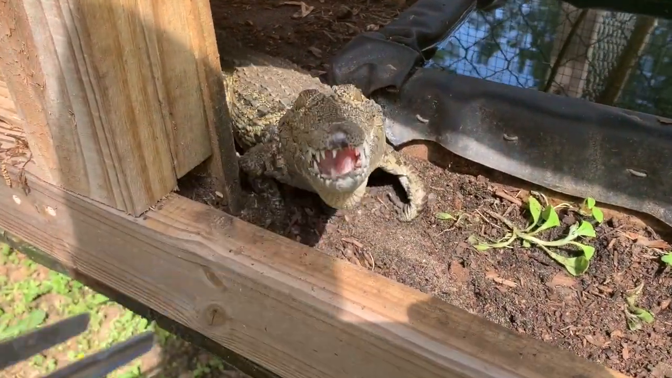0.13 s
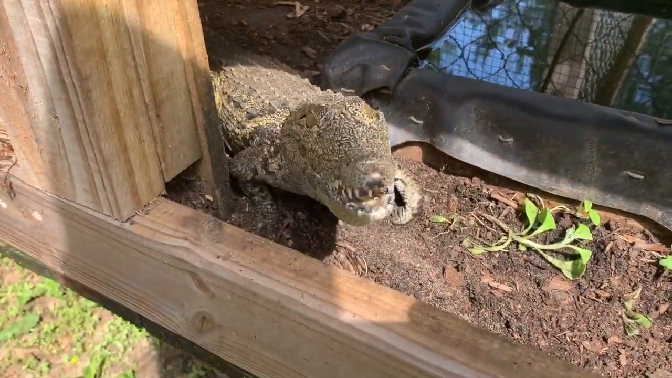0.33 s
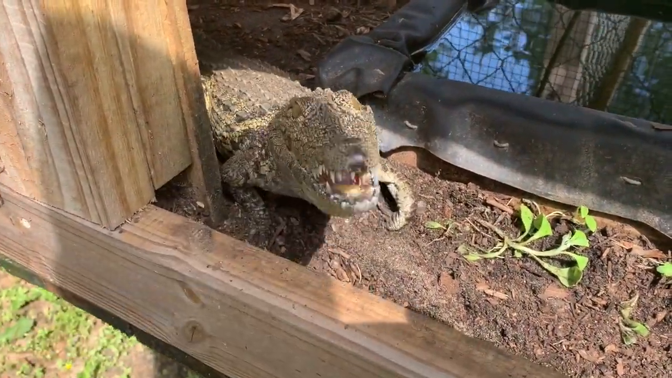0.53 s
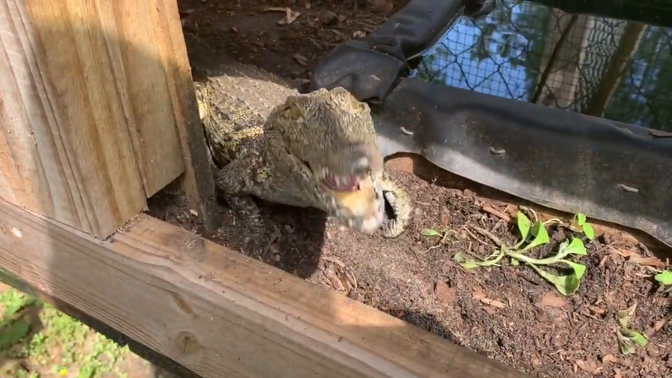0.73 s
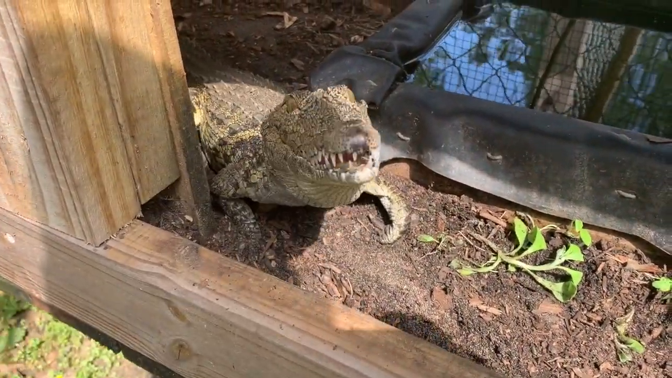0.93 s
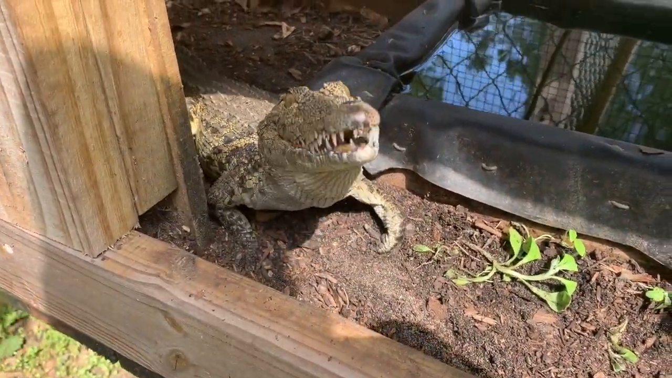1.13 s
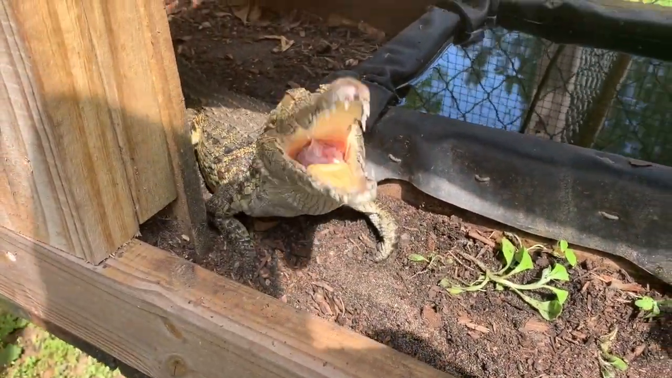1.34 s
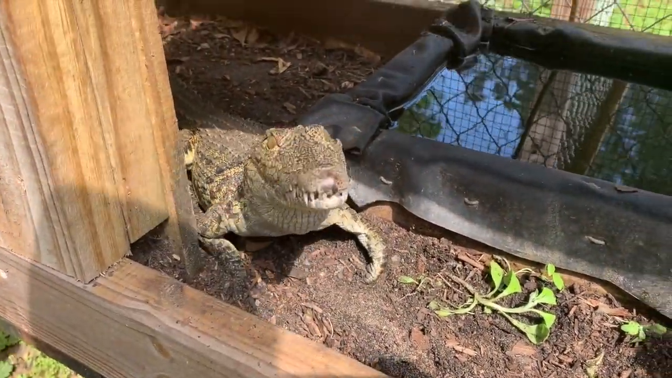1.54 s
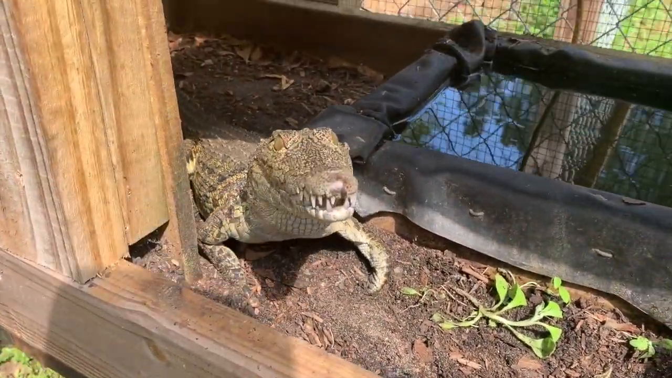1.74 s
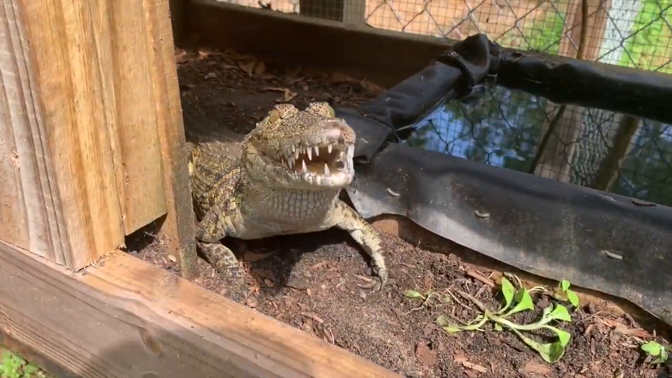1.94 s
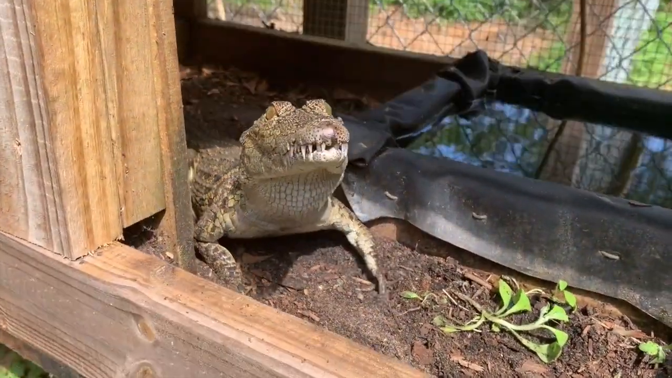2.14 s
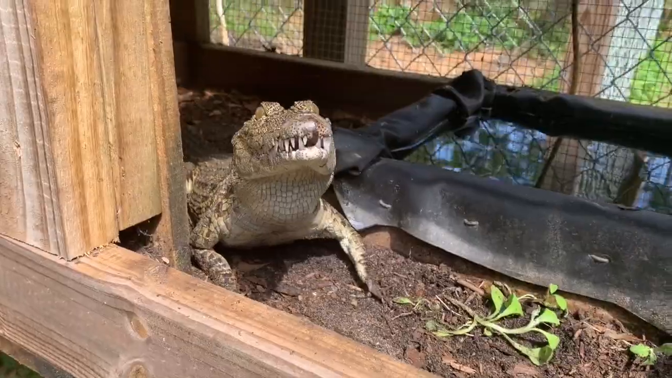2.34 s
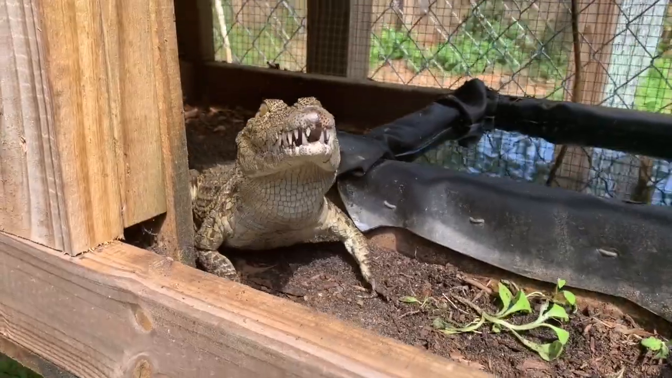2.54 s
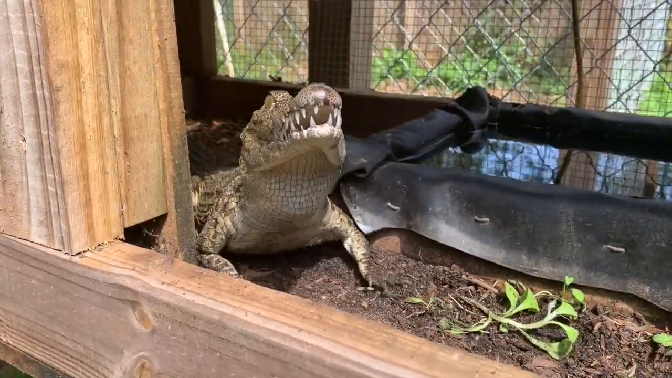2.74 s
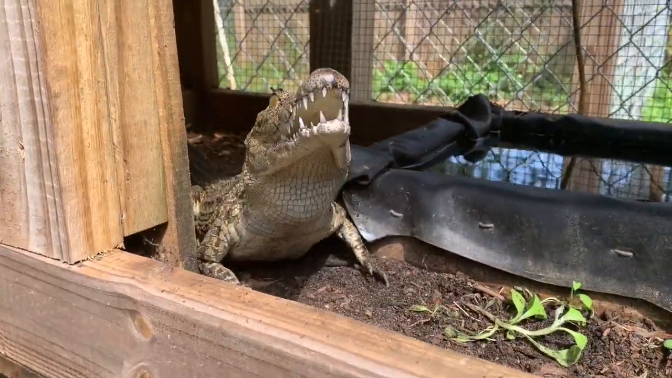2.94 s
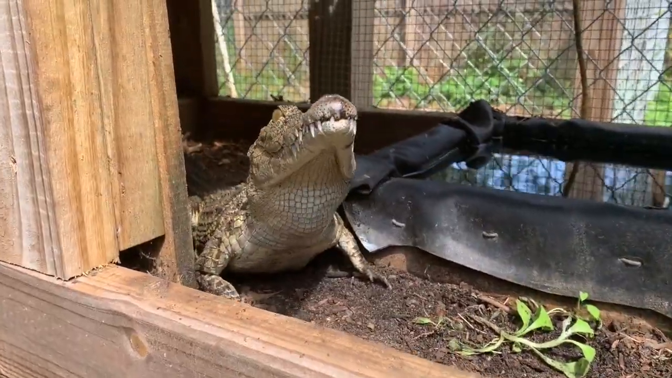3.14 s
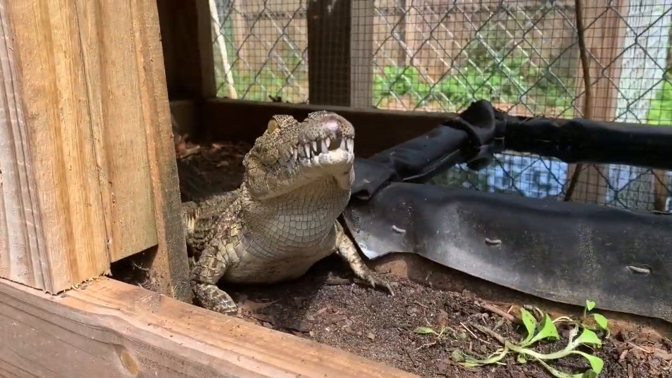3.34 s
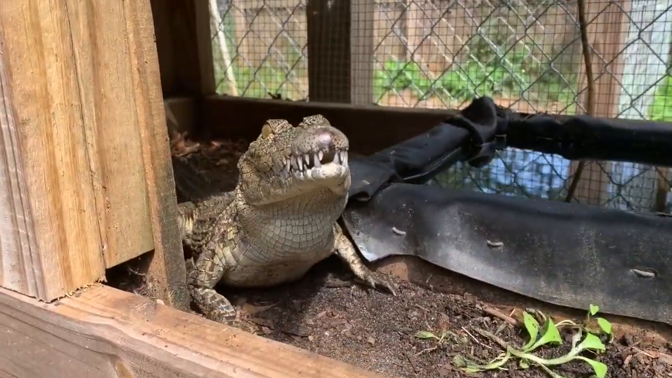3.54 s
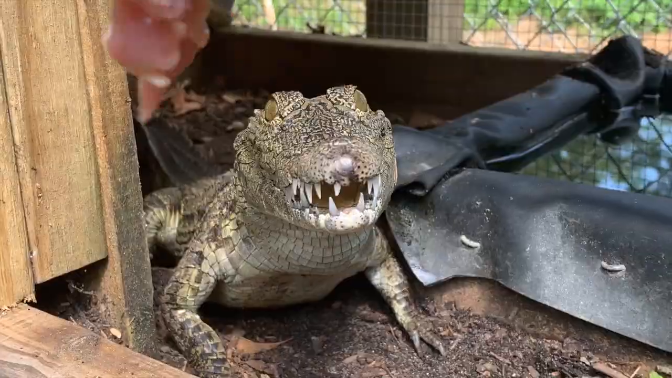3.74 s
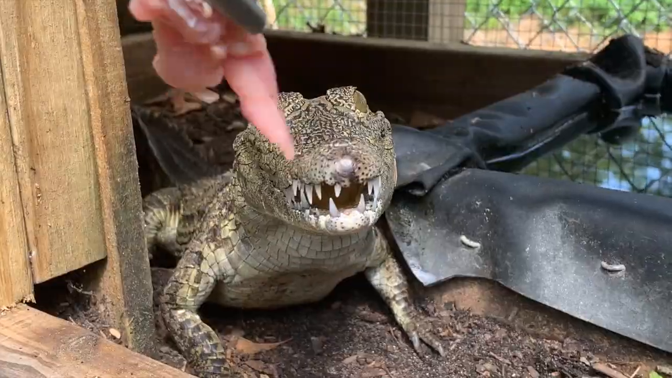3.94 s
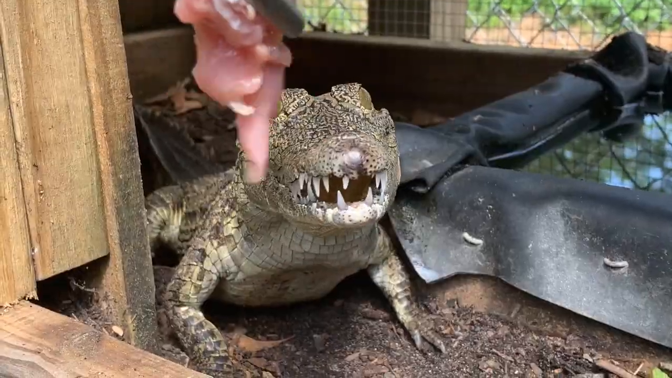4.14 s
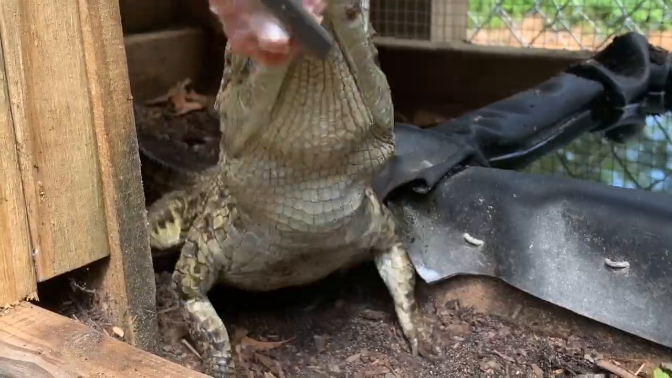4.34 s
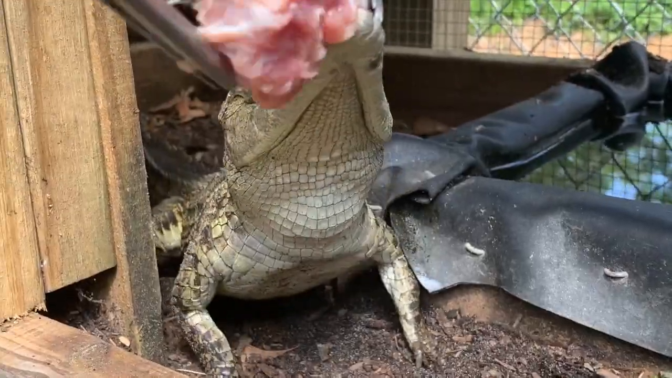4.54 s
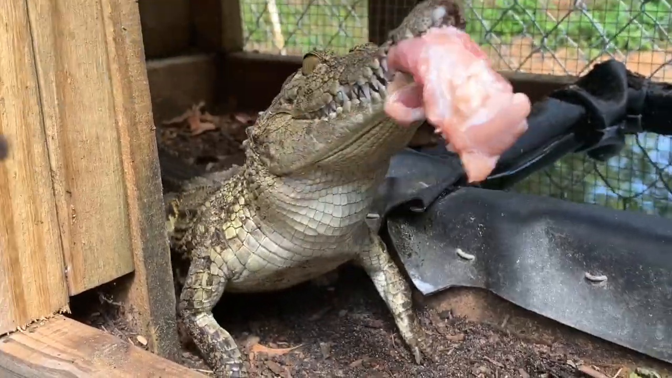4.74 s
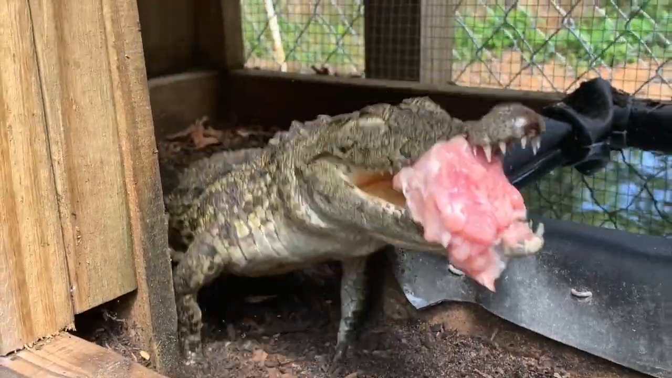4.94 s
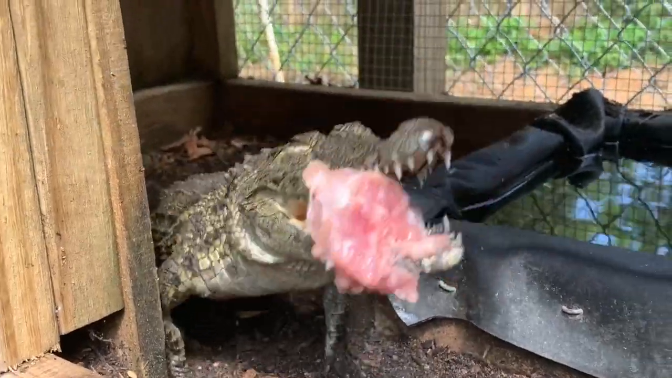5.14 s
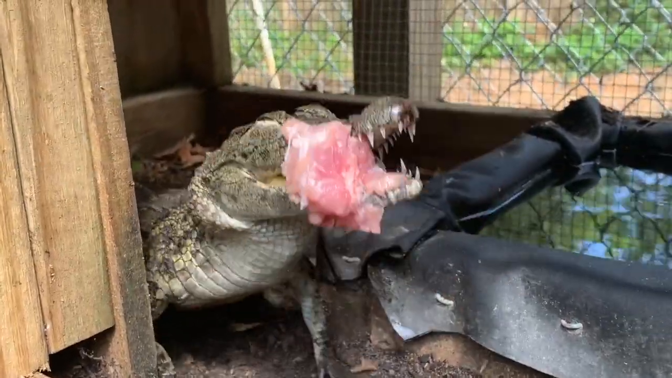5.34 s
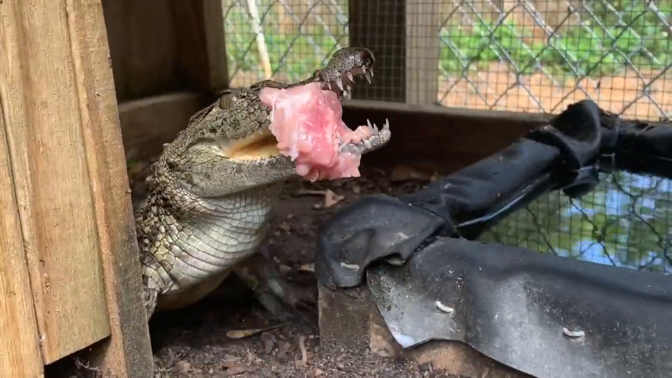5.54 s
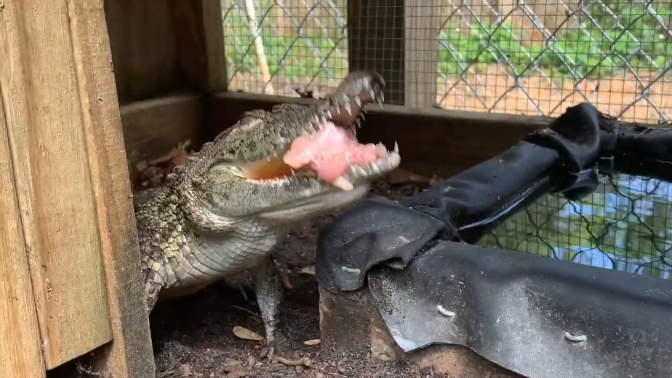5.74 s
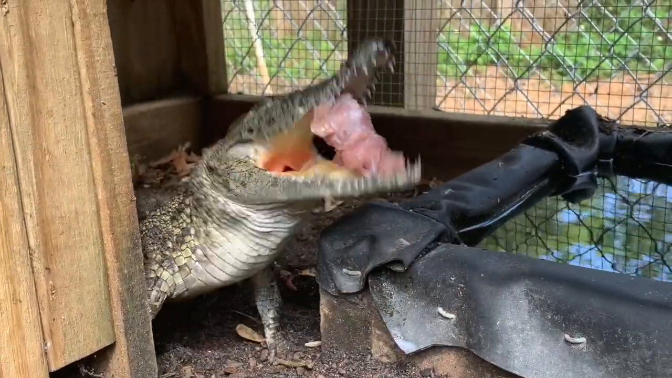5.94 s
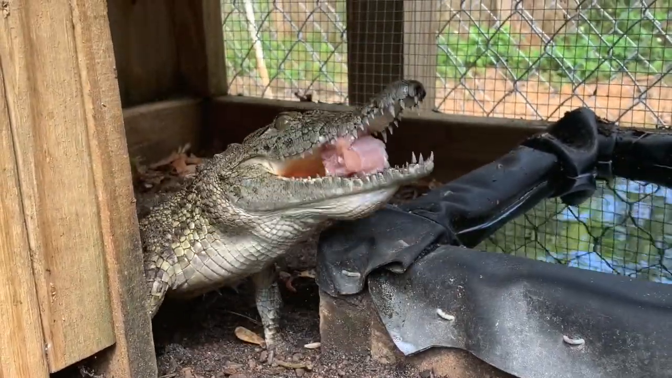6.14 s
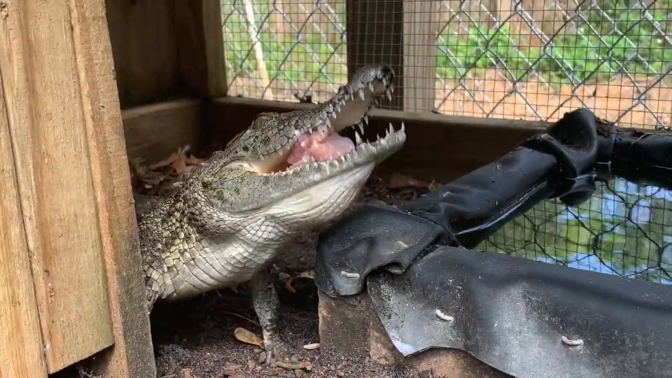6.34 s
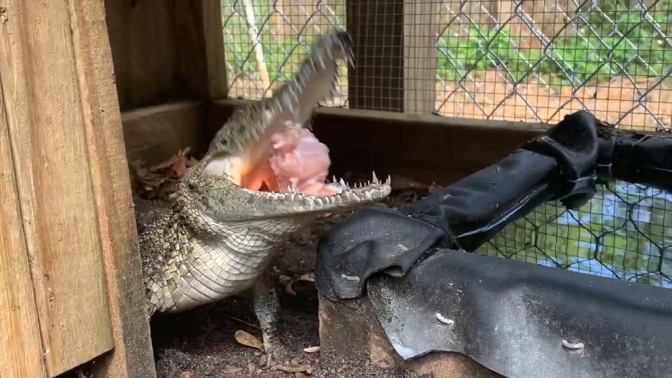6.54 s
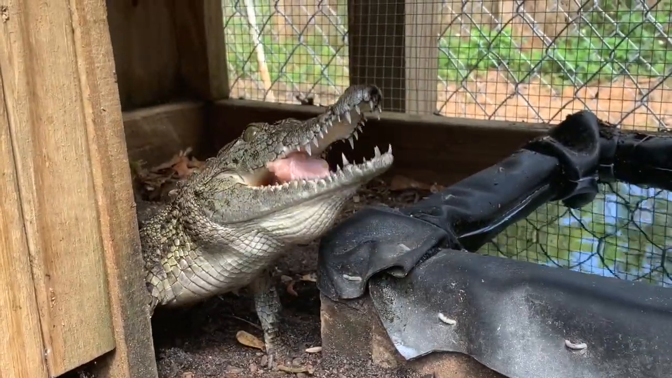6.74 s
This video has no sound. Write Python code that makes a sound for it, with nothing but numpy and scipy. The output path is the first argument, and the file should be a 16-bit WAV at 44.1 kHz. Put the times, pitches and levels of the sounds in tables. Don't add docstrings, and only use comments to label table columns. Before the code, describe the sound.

Outdoors, near a phone, faint claw ticks and soft soil rustle sit over low distant traffic, thin tree hiss and very faint insect trills. From 0.6 to 1.3 s dry twigs crack in irregular clusters, with a sharp snap at 0.8 and the strongest crackles around 1.1. A brief firm scrape comes at 1.6, then quiet, restless shuffling with scattered leaf ticks until 3.2. Snaps, cracks and a faint hollow board rub return from 3.2 to 3.7, then it hushes. Leaves crunch and feet land softly at 4.35, and at 4.44 teeth hit steel tongs: a loud, bright, very fast clack with a short metallic ring. At 4.9 the body drops with a dull, deep thud and claw clicks. From 5.1 to 6.6 come crisp chewing snaps and small wet ticks, strongest near 5.3, 5.7 and 6.3, thinning over the faint rumble.

```python
import sys
import numpy as np
from scipy import signal
from scipy.fft import rfft, irfft, next_fast_len
from scipy.io import wavfile
from scipy.ndimage import uniform_filter1d, map_coordinates

SR = 44100
rng = np.random.default_rng(int(sys.argv[2]) if len(sys.argv) > 2 else 0)


def materialize(psi):
    bounded = np.clip(np.atleast_2d(psi).T, -1, 1)
    quanta = np.round(bounded * 32767).astype(np.int16)
    wavfile.write(sys.argv[1], SR, quanta)


def invert_db(level):
    return 10 ** (np.asarray(level, dtype=float) / 20)


N = 299306


def unit(x):
    return x / np.sqrt(np.mean(x ** 2) + 1e-20)


def along(points, hz):
    f, v = np.transpose(points)
    return np.interp(np.log(hz + 1), np.log(f + 1), v)


def curves(rows):
    s, *cols = np.transpose(rows)
    return [np.interp(np.arange(N) / SR, s, c) for c in cols]


def wobble(rate):
    knots = rng.standard_normal(int(N * rate / SR) + 4)
    return map_coordinates(knots, [np.arange(N) * rate / SR])


def filtered(x, response):
    n = x.shape[-1]
    m = next_fast_len(n + 4096)
    return irfft(rfft(x, m) * response(np.fft.rfftfreq(m, 1 / SR)), m)[..., :n]


def noise(spectrum, n=N):
    return unit(filtered(rng.standard_normal((2, n)), lambda hz: invert_db(along(spectrum, hz))))


def add(track, s, sound):
    part = track[..., round(s * SR):][..., :sound.shape[-1]]
    part += sound[..., :part.shape[-1]]


def decay(t, t60, attack):
    return invert_db(-60 * t / t60) * (1 - np.exp(-t / attack))


def patchy(pair, depth_db):
    def smooth(bins, frames):
        rough = rng.standard_normal(z.shape[1:])
        return unit(uniform_filter1d(uniform_filter1d(rough, size=bins, axis=0), size=frames, axis=1))
    z = signal.stft(pair, nperseg=256)[2]
    gain_db = depth_db * smooth(4, 9) + 3.06 * smooth(2, 60)
    return unit(signal.istft(z * invert_db(gain_db), nperseg=256)[1][:, :N])


def bite():
    # t/s, peak level/dB, t60/s
    teeth = [
        (4.4409, -9, .003),
        (4.4413, -5, .003),
        (4.4423, -7, .006),
        (4.4428, -6, .008),
        (4.4441, -13, .012),
        (4.4466, -8, .009),
        (4.4487, -15, .014),
        (4.4522, -23, .018),
        (4.4568, -25, .010),
    ]
    # f/Hz, level/dB
    enamel = [(600, -37.5), (1500, -34.5), (2200, -15), (3000, -41.5), (4500, -11), (6500, -17.5),
              (8700, -6), (10200, -4), (11600, -1), (13200, 0), (14800, -3), (16000, -9), (16700, -45.5)]
    # f/Hz, level/dB, t60/s
    tongs = [(1880, -35, 0.075), (3505, -45, 0.0498), (3650, -37.5, 0.11), (4230, -24.5, 0.04),
             (4800, -23, 0.04), (5440, -22, 0.045), (10500, -23, .02), (14850, -19.5, 0.014)]
    out, t = np.zeros((2, N)), np.arange(SR // 5) / SR
    for s, db, t60 in teeth:
        contact = noise(enamel, len(t)) * decay(t, t60, 0.000067)
        add(out, s, invert_db(db + 0.5) * contact / np.abs(contact[0]).max())
    slide = noise([(3000, -22), (4800, 1), (7500, -7.5), (9500, -45.5)], len(t))
    add(out, 4.43, invert_db(-33.0) * slide * decay(t, 0.082, 0.0048))
    drift = np.cumsum(rng.standard_normal((len(tongs), len(t))), axis=1) * 0.027
    for (hz, db, t60), phase in zip(tongs, drift):
        ring = np.sin(2 * np.pi * hz * t + phase)
        add(out[0], teeth[1][0], invert_db(db) * decay(t, t60, 0.00054) * ring)
    return out


def clicks():
    # t/s, peak level/dB, brightness/dB, main resonance f/Hz
    twigs = [(.6111, -27.5, -7, 2020), (.6306, -31.5, -28, 2900), (.6574, -32.5, -46, 1800),
             (.7406, -36, -29, 1220), (.7492, -31, -28, 1210), (.7676, -25, -26, 2160),
             (.7983, -31.5, -19, 1870), (.8483, -31.5, -14, 2970), (.954, -34.5, -21, 1520),
             (.9619, -38, -23, 2180), (.986, -38.5, -31, 2210), (1.0611, -38.5, -20, 1490),
             (1.1115, -18.5, 0.5, 2100), (1.1328, -24, -9, 2310), (1.1372, -16.5, -10, 2200),
             (1.1425, -25, -30, 1300), (1.166, -32, -15, 3300), (1.191, -35.5, -30, 2020),
             (1.237, -34.5, -20, 2500), (1.08, -37, -30, 2800), (1.1557, -22.5, -24, 1230),
             (1.2275, -25, -19.5, 2100), (1.2813, -33, -33, 1520), (1.7359, -36.5, -45, 1180),
             (2.3597, -38, -18, 1680), (2.5618, -42, -38, 1600), (2.664, -39.5, -26, 1820),
             (2.7307, -42, -44, 1230), (3.485, -25, -14.5, 1170), (3.5145, -35, -14, 1570),
             (3.5445, -28.5, -20, 1340), (3.6368, -25.5, -21, 1320), (3.7333, -45, -36, 1530),
             (5.4707, -44, -15, 2020), (6.0134, -34.5, -22, 1775)]
    # t/s, peak level/dB, brightness/dB, main resonance f/Hz
    leaves = [(.683, -36.5, -44, 2680), (.9128, -40, -28, 3230), (1.0077, -39, -22, 1740),
              (1.7946, -45.5, 11, 1810), (1.9383, -37, -16, 4330), (2.2946, -39, -15, 6400),
              (2.3365, -47, -10, 2710), (2.3676, -37, -22, 2040), (2.6363, -40, -30, 2330),
              (2.8648, -47.5, -45, 2060), (3.1629, -37.5, -29, 1530), (3.3118, -40, -9, 1360),
              (3.4097, -36, -15, 4200), (3.4357, -34.5, -38, 2440), (3.4482, -32.5, -20, 1350),
              (3.6028, -30.5, -15.5, 5300), (4.3513, -32.5, -7.5, 3940), (4.392, -22.5, -9, 3320),
              (4.497, -43, -20, 3920), (4.545, -48, -2, 2400), (4.578, -47.5, -16, 3900),
              (4.6, -52, -18, 2200), (4.635, -44, -17, 2200), (4.665, -50, -11, 2600),
              (4.8695, -41.5, 13.5, 3680), (5.0975, -46, 1, 5000), (5.7296, -29, 9, 2020),
              (6.7706, -37, -68, 1860)]
    # t/s, peak level/dB, brightness/dB
    claws = [(0.0944, -33.5, 17), (0.1406, -36.5, 41), (0.5103, -40, 26), (1.057, -39, 21),
             (1.0723, -31, 51), (1.0883, -28.5, 43), (1.3022, -43, 4), (1.4436, -36, 17), (1.4582, -41, 14),
             (1.4647, -30, 30), (4.9083, -20, 28), (4.9163, -20.5, 14), (4.92, -26.5, -10),
             (5.3716, -33.5, 13), (5.5962, -34.5, 51), (5.722, -40, 15), (5.782, -36, 17), (6.0375, -38, 9),
             (6.296, -36, 17), (6.5842, -36, 28)]
    # t/s, peak level/dB, brightness/dB, main resonance f/Hz
    snaps = [(.8243, -17, -16, 2710), (2.4093, -47, -5, 4410), (3.2552, -27, -13.5, 5360),
             (5.1314, -31.5, 10, 5060), (5.1376, -31, 7, 4780), (5.1576, -35.5, 7, 5920),
             (5.221, -33.5, -15, 2230), (5.2816, -38, -2, 4700), (5.2872, -24, -12, 5500),
             (5.3237, -17.5, -4.5, 5100), (5.5504, -41.5, -35, 2170), (5.6918, -33, 12, 5200),
             (5.7355, -21, -10.5, 4800), (5.9831, -39, 3, 5840), (6.0763, -31.5, -18, 2220),
             (6.0919, -38, -8, 2720), (6.3363, -21, 8.5, 5060), (6.5381, -46.5, -37, 1885),
             (6.5967, -36, 12, 5710), (6.625, -48, 1, 4540)]
    # t/s, peak level/dB, brightness/dB, main resonance f/Hz
    ticks = [(5.2302, -25, -5, 3000), (5.2447, -43, 8, 7000), (5.2519, -32, 7, 5880), (5.259, -30, 6, 7500),
             (5.295, -30, -9, 4500), (5.3305, -31, 4, 6000), (5.345, -37, 12, 7500),
             (5.3927, -20.5, 3, 5300), (5.6885, -36, 5, 6500), (5.7415, -32, 0, 5000),
             (5.753, -37, 4, 8000), (5.757, -38, 10, 8000), (4.409, -34, 20, 8000), (3.5, -46, 8, 7000),
             (4.429, -41, 15.5, 8000), (5.274, -50, 5, 7000), (3.203, -54, -15, 4800)]
    claw_hz = 1990
    claws = [(*row, claw_hz) for row in claws]
    # rows, bass tilt/dB, t60/s, tail level/dB
    kinds = [(twigs, -8.5, 0.017, -16.5), (leaves, -9, 0.041, -12), (claws, -2, 0.0049, -19.5),
             (snaps, -23.5, 0.015, -17), (ticks, -17.5, 0.0061, -18.5)]
    out, t = np.zeros((2, N)), np.arange(SR // 12) / SR
    modes = np.geomspace(400, 16000, num=70)
    for rows, low_db, t60, tail_db in kinds:
        body = decay(t, t60, 0.00007)
        spike = invert_db(2.5) * decay(t, 0.0017, 0.00027)
        tail = invert_db(tail_db) * decay(t, 0.069, 0.00128)
        for s, db, high_db, hz in rows:
            colour = [(120, low_db - 22.0), (600, low_db + 6), (hz * 0.6, 0.55 * low_db - 3.5),
                      (hz * 0.91, -5), (hz, 3), (hz * 1.03, -5),
                      (9000, high_db - 0.5), (15500, high_db - 6.0), (16600, -50)]
            modes_db = along(sorted(colour), modes) + 4 * rng.standard_normal(len(modes))
            burst = noise(list(zip(modes, modes_db)), len(t)) * (spike + body + tail)
            add(out, s - .0003, invert_db(db - 4.0) * burst / np.abs(burst[0]).max())
    return out


def thuds():
    # t/s, peak level/dB, starting f/Hz, t60/s
    landings = [(4.351, -38, 524, 0.067), (4.364, -31, 490, 0.026), (4.376, -28, 570, 0.03),
                (4.871, -30, 400, 0.019), (4.896, -17, 783, 0.079), (4.9059, -20.5, 824, 0.058),
                (4.9195, -22, 610, 0.068), (4.974, -29, 895, 0.011), (6.327, -38.5, 447, 0.063),
                (2.67, -35.5, 815, 0.037), (0.264, -59, 500, .04), (0.424, -54, 1100, 0.026)]
    # t/s, peak level/dB, f/Hz, t60/s
    ground = [
        (4.868, -38.5, 91, 0.15),
        (4.897, -34, 119, 0.069),
        (4.923, -26.5, 98, 0.088),
    ]
    # f/Hz, level/dB
    puff = [(250, -29), (550, 5.5), (900, -6), (1400, -14), (3500, -24.5)]
    belly_hz = 168
    puff_db, puff_t60_s = -12.5, 0.04
    out, t = np.zeros((2, N)), np.arange(SR // 8) / SR
    for s, db, hz, t60 in landings:
        pitch = belly_hz + (hz - belly_hz) * np.exp(-t / .0022)
        push = np.sin(2 * np.pi * np.cumsum(pitch) / SR)
        add(out[0], s, invert_db(db) * decay(t, t60, 0.0023) * push)
        add(out, s, invert_db(db + puff_db) * decay(t, puff_t60_s, 0.0035) * noise(puff, len(t)))
    for s, db, hz, t60 in ground:
        add(out[0], s, invert_db(db) * decay(t, t60, 0.0068) * np.sin(2 * np.pi * hz * t))
    return out


def dragging():
    # start t/s, length/s, scrape level/dB, sizzle over scrape/dB
    strokes = [(0.614, 0.056, -55, -28), (0.756, 0.054, -53.5, -19), (0.96, 0.047, -60.5, -12),
               (1.121, 0.056, -55, -23), (1.163, 0.057, -56, -10.5), (1.289, 0.011, -52.5, -5),
               (1.434, 0.1, -56, -2), (3.223, 0.028, -52, -12), (3.297, 0.06, -59, -5),
               (3.45, 0.13, -59, -9), (3.546, 0.099, -58.5, -24), (4.367, 0.034, -51.5, -6.5),
               (4.459, 0.061, -66.5, 4), (4.559, 0.1, -68, -6), (4.898, 0.016, -52, -10),
               (5.132, 0.023, -66, 0.5), (5.24, 0.24, -66.5, -2), (5.69, 0.079, -59.5, -5),
               (6.009, 0.024, -66, 5.5), (6.03, 0.074, -68.5, -2), (6.29, 0.063, -71.5, 4),
               (6.602, 0.055, -71.5, -2.5)]
    # t/s, scrape level/dB
    restless = [(0, -65.5), (.15, -69), (.5, -71.5), (.9, -65.5), (1.36, -65.5), (1.7, -64), (1.92, -62),
                (2.1, -68), (2.6, -63.5), (3, -70.5), (3.68, -62.5), (3.74, -81.5), (4.85, -77.5),
                (4.95, -63), (5.1, -69), (5.8, -67), (5.97, -79), (6.79, -75.5)]
    # t/s, sizzle over scrape/dB
    dryness = [(0, -5), (2.1, -3.5), (3, -13), (4.6, -3), (6.79, -9.5)]
    rise_db_per_s, fall_db_per_s = 499.5, 403
    edged = [(*row, rise_db_per_s, fall_db_per_s) for row in strokes]
    edged.append((1.578, 0.053, -46.5, -2, 1100, 1100))
    t = np.arange(N) / SR
    scrape = invert_db(curves(restless)[0]) ** 2
    sizzle = scrape * invert_db(curves(dryness)[0]) ** 2
    for s, length, db, dry_db, rise, fall in edged:
        power = invert_db(db - rise * (s - t).clip(0) - fall * (t - s - length).clip(0)) ** 2
        scrape = scrape + power
        sizzle = sizzle + power * invert_db(dry_db) ** 2
    return 10 * np.log10(scrape), 10 * np.log10(sizzle)


def shuffle():
    # f/Hz, level/dB
    scrape_colour = [(500, -33), (1200, 2.5), (2500, -1), (4500, -4), (7000, -7), (10000, -30)]
    # f/Hz, level/dB
    sizzle_colour = [(4000, -34.5), (7000, -6), (9500, -5.5), (12000, -18.5), (14300, -12), (15000, -28),
                     (16000, -39.5)]
    # f/Hz, level/dB
    soil_colour = [(150, -31), (300, 0.5), (500, 4.5), (900, 6), (1500, -20), (3000, -38)]
    scrape_db, sizzle_db = dragging()
    grains = (rng.random(N) < 160 / SR) * invert_db(4.5 * rng.exponential(size=N).clip(0, 2))
    grain_fall = invert_db(-60 * np.arange(SR // 50) / SR / 0.005)
    grit = 1 + .5 * signal.fftconvolve(grains, grain_fall)[:N]
    # colour, level/dB, share of grit, patch depth/dB
    layers = [(scrape_colour, scrape_db, 1.2, 2.8), (sizzle_colour, sizzle_db, .8, 1.8),
              (soil_colour, scrape_db - 3, .6, 3.5)]
    out = np.zeros((2, N))
    for colour, db, share, depth_db in layers:
        out += invert_db(db) * unit(grit ** share * patchy(noise(colour), depth_db))
    return out


def board():
    # start t/s, level/dB, length/s
    rubs = [
        (3.211, -51.5, 0.061),
        (3.473, -43, 0.036),
        (3.625, -45.5, 0.03),
    ]
    # f/Hz, level/dB
    hum = [(700, -39), (880, -3), (950, 14), (1150, -32)]
    out = np.zeros((2, N))
    for s, db, length in rubs:
        t = np.arange(round(length * SR)) / SR
        add(out, s, invert_db(db - 5.5) * np.sin(np.pi * t / length) * noise(hum, len(t)))
    return out


def background():
    # t/s, level/dB
    traffic_levels = [(0.0, -57), (0.36, -58.5), (0.98, -60), (1.32, -56), (1.64, -61), (2.87, -58),
                      (3.01, -60.5), (3.57, -57), (4.06, -60), (4.86, -58), (5.27, -60.5), (5.61, -58),
                      (6.39, -61.5), (6.79, -59.5)]
    # f/Hz, level/dB
    rumble = [(13, -59), (22, -33.5), (29, -26), (36, -9.5), (60, 1), (135, 0), (156, -6), (183, -7),
              (263, -16), (330, -30.5), (430, -52), (730, -120)]
    # f/Hz, level/dB
    trees = [(200, 2.5), (450, 11.5), (800, 0), (1500, 1), (3000, -12), (3500, -11.5), (5200, -28.5),
             (6400, -6), (7300, -4), (8400, -23.5), (9600, -13), (11000, -19.5), (14300, -21.5),
             (14900, -54.5)]
    # start t/s, end t/s, first f/Hz, last f/Hz, level/dB
    trills = [
        (0, .3, 3400, 3220, -72.5),
        (.16, .32, 4000, 3900, -84),
        (1.85, 2.065, 3000, 3180, -76),
        (2.4, 2.628, 3180, 3100, -74),
        (2.72, 2.857, 4050, 3750, -77),
        (3.71, 3.88, 3200, 3080, -80),
        (3.9, 4.35, 3170, 2960, -79.5),
    ]
    traffic = invert_db(curves(traffic_levels)[0] + 5.0) * unit(invert_db(0.5 * wobble(4.6)) * noise(rumble))
    out = traffic + invert_db(-65.5) * patchy(noise(trees), depth_db=3.5)
    flutter = .35 + .9 * np.array([wobble(120), wobble(120)])
    for start, end, first_hz, last_hz, db in trills:
        t = np.arange(round((end - start) * SR)) / SR
        line = np.sin(2 * np.pi * np.cumsum(np.linspace(first_hz, last_hz, len(t))) / SR)
        swell = np.abs(np.sin(np.pi * t / t[-1])) ** .5
        add(out, start, invert_db(db + 4) * swell * line * flutter[:, round(start * SR):][:, :len(t)])
    return out


def stereo(pair, alike, zoomed_alike):
    # f/Hz, right side's lead/rad
    ports = [(60, 0), (226, -2.9), (420, -6.1), (700, -9.2), (900, -7.6), (1500, -9.4), (2700, -12.6),
             (3100, -13.5), (4200, -13.2), (5000, -15.7), (6000, -18.7), (7700, -23.3), (8600, -22),
             (16500, -6.3)]
    zoomed_ports = list(ports[:9]) + [(5200, -15), (5900, -14.9), (8600, -9.43), (16500, 6.27)]
    zoom_s = 3.72

    def through(likeness, network):
        def split(hz):
            turn = np.arccos(np.clip(along(likeness, hz), 0, 1)) / 2
            return np.array([np.cos(turn), np.sin(turn)])

        def phase(hz):
            lead = np.interp(hz, *np.transpose(network)) / 2
            return np.exp(1j * np.array([-lead, lead]))
        mid, side = filtered(pair, split)
        return filtered(np.array([mid + side, mid - side]), phase)
    zoom = ((np.arange(N) / SR - zoom_s) / .02).clip(0, 1)
    return (1 - zoom) * through(alike, ports) + zoom * through(zoomed_alike, zoomed_ports)


def scene():
    # f/Hz, likeness
    near_alike = [(100, 0.32), (600, 0.78), (1500, 0.56), (4000, 0.42), (6500, 0.2), (8300, 0.54),
                  (16000, 1)]
    # f/Hz, likeness
    near_zoomed = [(100, 0.442), (600, 0.75), (1500, 0.42), (4000, 0.34), (5600, 0.3), (6500, 0.85),
                   (16000, 0.98)]
    # f/Hz, likeness
    far_alike = [(60, 1), (300, 0.38), (1500, 0.13), (4000, 0.24), (8000, .3), (11000, 1), (16000, 0.97)]
    near = stereo(bite() + clicks() + thuds() + shuffle() + board(), near_alike, near_zoomed)
    far = stereo(background(), far_alike, far_alike)
    return near + invert_db([[-.6], [.6]]) * far


def top_cut(x):
    return signal.sosfilt(signal.butter(12, 16800, fs=SR, output="sos"), x)


def record(dry):
    top_hz, bass_hz = 16100, 38

    def band(hz):
        return invert_db(-.05 * (hz - top_hz).clip(0)) / np.sqrt(1 + (bass_hz / (hz + 1)) ** 6)
    return top_cut(filtered(dry, band))


dry = scene()
out = record(dry)
materialize(out)
```